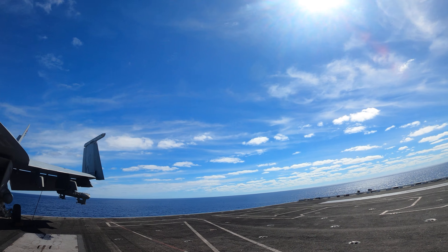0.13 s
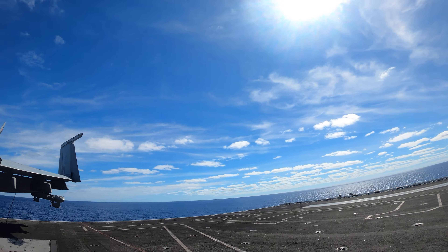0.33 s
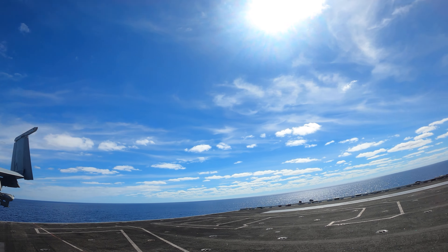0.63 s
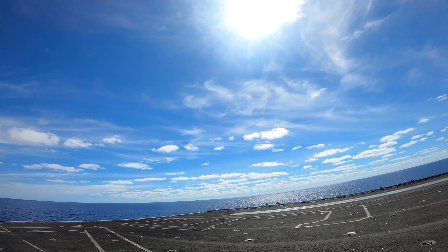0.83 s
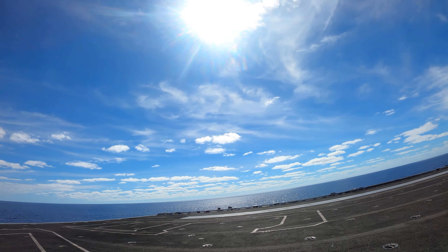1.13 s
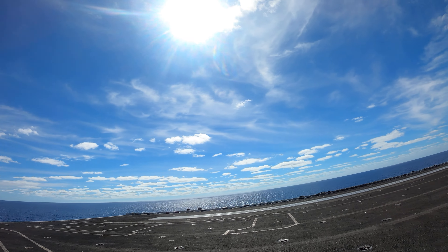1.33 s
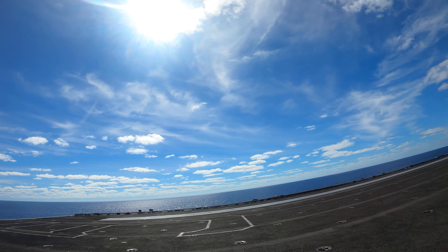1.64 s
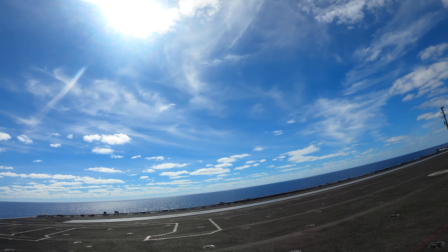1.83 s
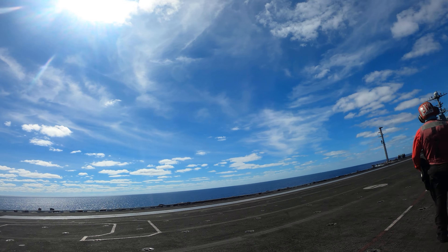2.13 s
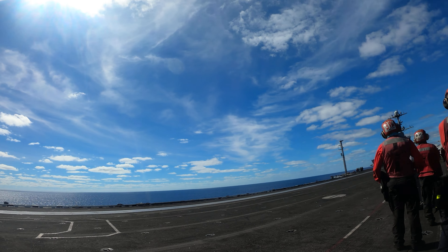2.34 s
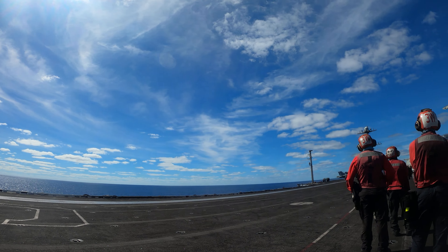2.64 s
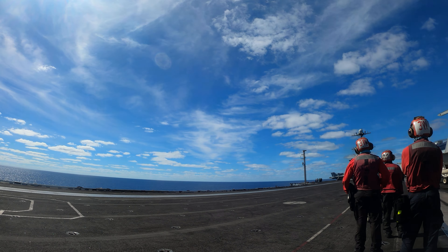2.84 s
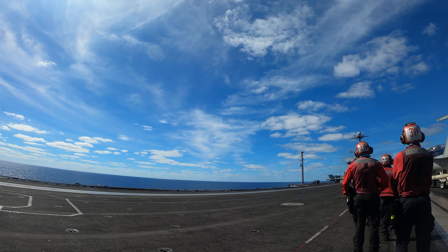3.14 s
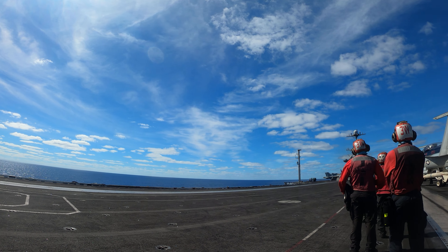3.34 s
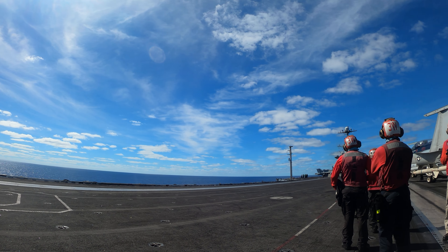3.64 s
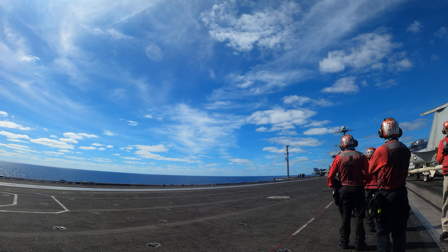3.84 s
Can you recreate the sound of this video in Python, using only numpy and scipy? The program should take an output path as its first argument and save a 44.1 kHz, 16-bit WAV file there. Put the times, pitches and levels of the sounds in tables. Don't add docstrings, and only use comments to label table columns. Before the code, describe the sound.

Jet engines roar and whine on an open ship deck, whine fading as roar swells

```python
import sys
import numpy as np
from scipy import signal
from scipy.fft import rfft, irfft
from scipy.io import wavfile
from scipy.ndimage import uniform_filter1d

SR = 44100
rng = np.random.default_rng(int(sys.argv[2]) if len(sys.argv) > 2 else 0)


def makeup_ratio(level_db):
    decades = np.asarray(level_db, float) / 20
    return 10 ** decades


def master_out(mix):
    frames = np.transpose(np.atleast_2d(mix))
    ceiling = np.clip(frames, -1, 1)
    pcm = np.round(ceiling * 32767).astype(np.int16)
    wavfile.write(sys.argv[1], SR, pcm)


N = 176400
TIME_S = np.arange(N) / SR
HZ = np.fft.rfftfreq(N, 1 / SR) + 1e-3


def rms_one(x):
    return x / np.sqrt(np.mean(x ** 2) + 1e-20)


def in_time(rows):
    return np.interp(TIME_S, *np.transpose(rows))


def bumps(rows, power):
    return sum(db * np.exp(-np.abs((TIME_S - s) / length_s) ** power) for s, length_s, db in rows)


def drift(rate_hz):
    hop, settle = 40, 2000
    pole = np.exp(-2 * np.pi * rate_hz * hop / SR)
    noise = rng.standard_normal(N // hop + settle + 2)
    slow = signal.lfilter([1], [1, -2 * pole, pole * pole], noise)[settle:]
    return np.interp(np.arange(N) / hop, np.arange(len(slow)), rms_one(slow - slow.mean()))


def coloured(colour):
    hz, db = np.transpose(colour)
    gain_db = np.interp(np.log(HZ), np.log(hz), db, left=-90, right=-90)
    return rfft(rng.standard_normal(N)) * makeup_ratio(gain_db)


def turbulence(colour, patchy_db):
    spectrum = coloured(colour)
    together = drift(5.4)
    out = 0
    for octave in np.arange(3, 15):
        share = np.cos(np.pi / 2 * np.clip(np.log2(HZ) - octave, -1, 1)) ** 2
        flicker_db = patchy_db * (0.28 * together + drift(11.5))
        out = out + irfft(spectrum * share, N) * makeup_ratio(flicker_db)
    return rms_one(out)


def narrow(hz, width_hz, steep=1.0):
    resonance = 1 / (1 + (2 * (HZ - hz) / width_hz) ** 2) ** steep
    return rms_one(irfft(rfft(rng.standard_normal(N)) * resonance, N))


def evened(x, share):
    size = int(0.054 * SR)
    power = uniform_filter1d(uniform_filter1d(x ** 2, size=size), size=size)
    return rms_one(x / (power + 0.02) ** (share / 2))


# (frequency [Hz], density [dB per Hz])
RUMBLE_COLOUR = [(8.8, -38), (15, -10.5), (43, 3), (59, 1), (97, -12.5), (151, -7), (200, -12), (260, -37),
                 (440, -120)]


def rumble():
    level_db, throb_db = -16, -2.5
    throb = makeup_ratio(throb_db) * narrow(67.5, width_hz=22.5)
    lows = turbulence(RUMBLE_COLOUR, patchy_db=0.3) + throb
    return makeup_ratio(level_db) * evened(rms_one(lows), share=0.42)


# (frequency [Hz], density [dB per Hz])
PORT_COLOUR = [(29, -40), (50, -2), (181, -5.5), (459, -7), (586, -7), (6010, -4.5), (10000, -10),
               (13000, -46), (22000, -120)]
# (time [s], length [s], gain [dB])
GUSTS = [
    (0.38, 0.12, 0.5),
    (0.69, .13, 9),
    (1.07, 0.024, 12.5),
    (1.5, 0.12, 7),
]


def port_difference():
    level_db = -51.5
    return makeup_ratio(level_db + bumps(GUSTS, power=7.7)) * turbulence(PORT_COLOUR, patchy_db=1.5)


# (frequency [Hz], density [dB per Hz])
LEAK_COLOUR = [(8000, -11), (9500, -5.5), (11200, 0), (11600, -8), (13000, -7), (13700, -13), (15700, -23)]
# (time [s], level [dB])
LEAK_LEVEL = [
    (0.3, -68),
    (1.2, -63),
    (1.65, -50.5),
    (2.1, -51),
    (2.4, -45),
    (3.0, -45.5),
    (4.0, -45.5),
]


def leak():
    hiss = rms_one(irfft(coloured(LEAK_COLOUR), N))
    return makeup_ratio(in_time(LEAK_LEVEL) + 0.7 * drift(6)) * hiss


def leak_side():
    level_db, lowest_hz = -3, 11500
    highpass = signal.butter(8, lowest_hz, "high", fs=SR, output="sos")
    return makeup_ratio(level_db) * signal.sosfilt(highpass, leak())


# (time [s], level [dB])
NEAR_LEVEL = [(0.3, -32), (0.55, -31), (0.8, -31), (1.1, -31.5), (1.3, -31.5), (1.7, -38), (1.85, -35),
              (2.3, -39.5), (2.7, -39), (3.1, -39), (3.6, -41.5), (4.0, -39)]


def near_level():
    return in_time(NEAR_LEVEL)


# (frequency [Hz], density [dB per Hz])
INTAKE_COLOUR = [(400, -4), (853, -1), (1360, -7), (3500, -10), (4550, -12.5), (7400, -19.5), (9600, -25.5),
                 (12000, -40), (15700, -58)]
# (time [s], length [s], gain [dB])
HISS_RISES = [
    (1.28, .06, 1.5),
    (1.63, 0.14, 3),
    (3.9, 0.17, 1.5),
]


def intake(near_db):
    gain_db = 9.5
    level_db = near_db + gain_db + bumps(HISS_RISES, power=3.0)
    return makeup_ratio(level_db) * turbulence(INTAKE_COLOUR, patchy_db=0.6)


# (multiple, skirt width [Hz], skirt level [dB], core level [dB], share of intake fading)
BLADE_PARTIALS = [(2, 52, -41, -43, 0.064), (3, 60, -42.5, -58, 0.83), (4, 75, -38, -43, 0.63),
                  (5, 134, -30, -33.5, 0.65), (6, 190, -35, -60, 1.2), (7, 120, -44, -64, 0.67),
                  (8, 250, -40, -66, 1.5), (9, 210, -51, -74, .7), (10, 250, -58, -78, 0.36)]
# (time [s], length [s], gain [dB])
SWELLS = [
    (0.9, 0.1, 12),
    (1.6, 0.082, 8),
    (2.88, 0.3, 13),
    (3.63, 0.083, 17.5),
]


def blade_whine(fading_db):
    blade_hz, wander_hz = 999.5, 1.2
    skirt_sag = 0.9968
    flutter_db, core_fades = 1.1, 1.6
    flutter = drift(24)
    swell_db = bumps(SWELLS, power=3.1)
    phase = 2 * np.pi * np.cumsum(blade_hz + wander_hz * drift(10.95)) / SR
    out = 0
    for multiple, width_hz, skirt_db, core_db, share in BLADE_PARTIALS:
        k = np.round(multiple)
        core_level_db = core_db + (core_fades - 1) * share * fading_db + 3.0 * drift(6)
        if k == 2:
            core_level_db = core_level_db + swell_db
        core = makeup_ratio(core_level_db) * np.sin(k * phase)
        smear = evened(narrow(skirt_sag * blade_hz * k, width_hz, steep=0.75), share=0.25)
        skirt = makeup_ratio(skirt_db + flutter_db * flutter) * smear
        out = out + makeup_ratio(share * fading_db) * (core + skirt)
    return out


TONES_HZ = [549, 1970, 4287]
# (width [Hz], level [dB], share of intake fading)
TONES = [(3, -39.5, -0.43), (5, -39.5, .4), (5, -49.5, 0.4)]


def shaft_tones(fading_db):
    out = 0
    for hz, (width_hz, db, share) in zip(TONES_HZ, TONES):
        out = out + makeup_ratio(db + share * fading_db) * evened(narrow(hz, width_hz), share=0.35)
    return out


# (frequency [Hz], density [dB per Hz])
ROAR_COLOUR = [(47, -32), (80, 0), (276, -3), (474, -10), (813, -8), (1510, -19), (1960, -19.5),
               (5010, -38.5), (9500, -52.5), (12400, -74), (20900, -120)]
# (frequency [Hz], width [Hz], level over roar [dB])
DUCTS = [(148, 71, -12), (273, 96, -11), (835, 240, -11), (1730, 400, -17), (2540, 1200, -24.5)]
# (time [s], level [dB])
FAR_LEVEL = [
    (0.3, -23),
    (0.8, -24),
    (1.2, -21.5),
    (1.7, -18),
    (2.1, -17.5),
    (2.5, -17),
    (3.0, -15.5),
    (3.5, -16),
    (4.0, -16),
]


def exhaust():
    ducts = sum(makeup_ratio(db) * narrow(hz, width_hz, steep=1.15) for hz, width_hz, db in DUCTS)
    return makeup_ratio(in_time(FAR_LEVEL)) * (turbulence(ROAR_COLOUR, patchy_db=0.43) + ducts)


def scene():
    near_db = near_level()
    fading_db = near_db - near_db.max()
    near_engine = intake(near_db) + blade_whine(fading_db) + shaft_tones(fading_db)
    mid = rumble() + leak() + near_engine + exhaust()
    side = port_difference() + leak_side()
    return np.array([mid + side, mid - side])


def top_cut(x):
    return signal.sosfilt(signal.butter(12, 15610, fs=SR, output="sos"), x)


def record(dry):
    fade_start_s, fade_s, fade_power = 0.23, 0.074, 1.83
    ceiling, drive = 1.05, 1.041
    fade = np.clip((TIME_S - fade_start_s) / fade_s, 0, 1) ** fade_power
    rounded = ceiling * np.tanh(drive * dry / ceiling)
    return top_cut(rounded * fade)


dry = scene()
out = record(dry)
master_out(out)
```